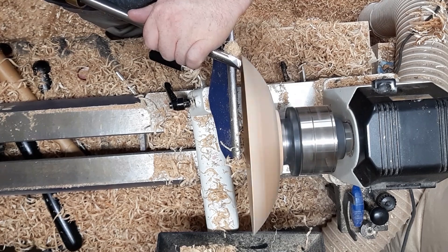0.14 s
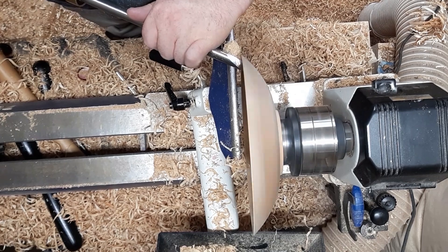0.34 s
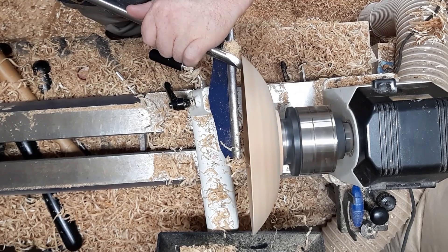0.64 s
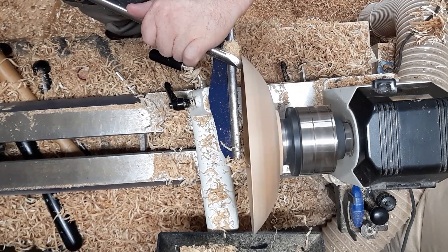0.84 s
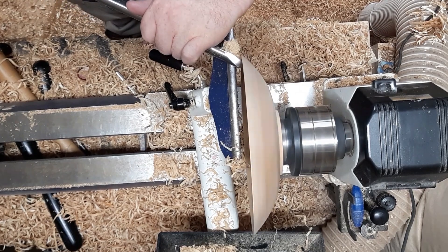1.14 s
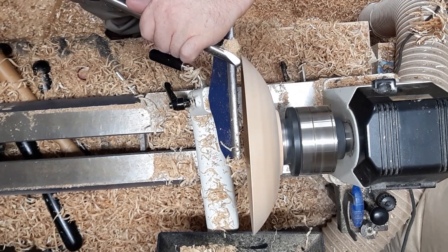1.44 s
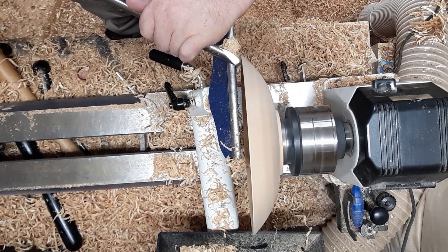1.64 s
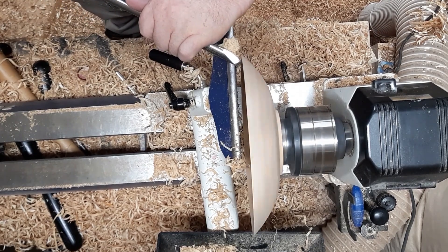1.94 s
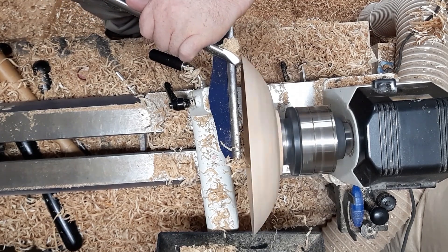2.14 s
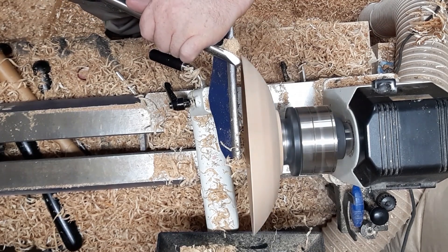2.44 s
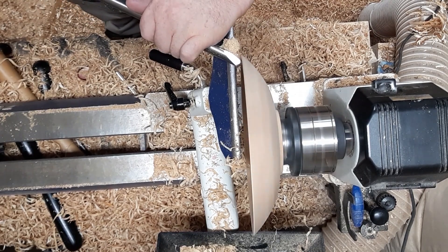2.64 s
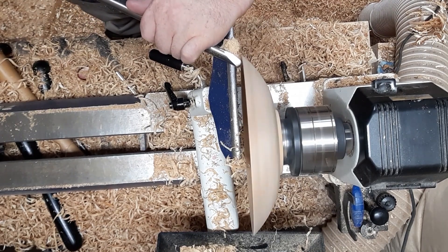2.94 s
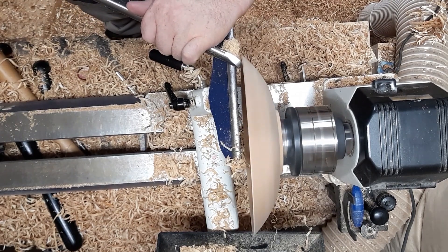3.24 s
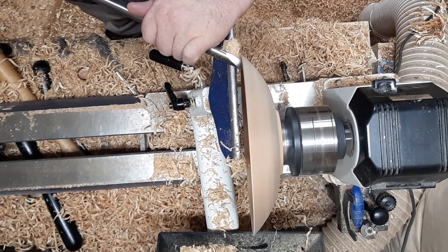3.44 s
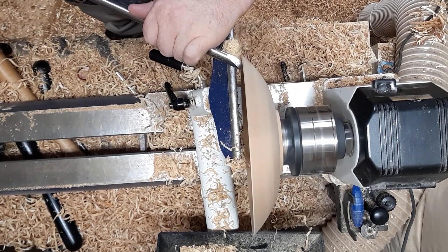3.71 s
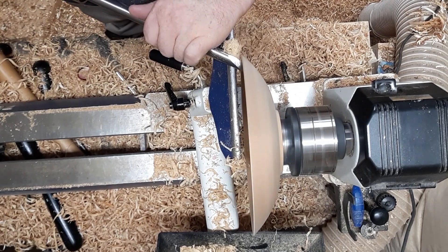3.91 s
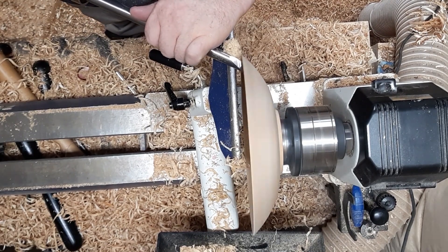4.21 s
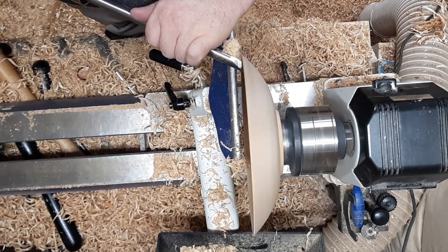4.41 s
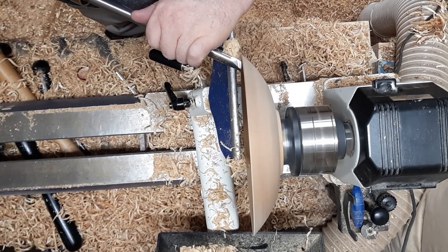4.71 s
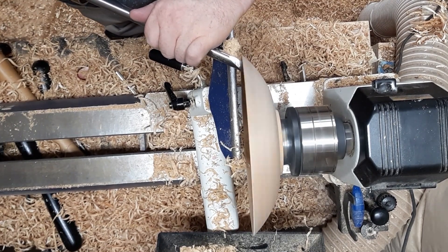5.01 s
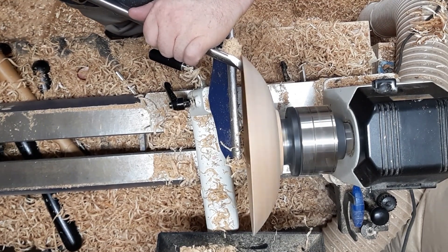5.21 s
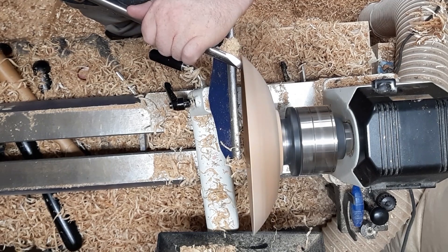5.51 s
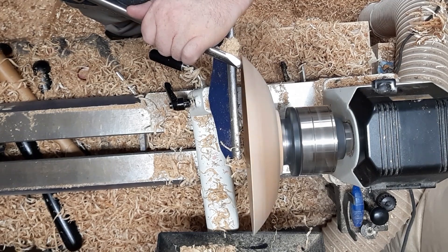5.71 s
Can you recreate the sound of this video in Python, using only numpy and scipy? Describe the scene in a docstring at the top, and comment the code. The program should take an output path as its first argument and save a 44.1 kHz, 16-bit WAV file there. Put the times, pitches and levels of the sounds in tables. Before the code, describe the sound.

A wood lathe hums steadily while a chisel rasps rhythmically against a turning bowl, lifts off for a second, then cuts again and squeals.

```python
"""A small workshop: a gouge shaves a wooden bowl on a lathe, lifts off for a second, and bites again.
The edge meets nearly the same wood every turn: end grain rasps once a turn, the thin wall rings at its
own angles. Hand pressure sets the loudness; when the edge stops biting, the bevel rides and squeals.
The motor hums, sagging under load, and its speed controller whistles. The gouge taps its rest,
a chip lands, and the room adds a short tail."""
import sys
import numpy as np
from scipy import signal
from scipy.fft import rfft, irfft, next_fast_len
from scipy.io import wavfile
from scipy.ndimage import map_coordinates

SR = 44100
rng = np.random.default_rng(int(sys.argv[2]) if len(sys.argv) > 2 else 0)


def inscribe(sig):
    """Save sig as 16-bit PCM at rate SR to the path in sys.argv[1].

    A 1-D sig is mono; a 2-D sig holds one channel per row.
    Samples are clipped to [-1, 1] before scaling.
    """
    pcm = np.round(np.clip(np.atleast_2d(sig).T, -1, 1) * 32767)
    wavfile.write(sys.argv[1], SR, pcm.astype(np.int16))


N = 258426

# spindle, slower under the cut: (time [s], speed [turns/s])
SPINDLE = [(0, 15.1), (1.35, 15.1), (1.55, 15.22), (2.55, 15.19), (2.7, 15.03), (3.7, 15.05), (4.5, 15.07),
           (5.86, 15.09)]
TIME_S = np.arange(N) / SR
SIDES = np.array([[.5], [-.5]])  # splits a left-minus-right offset
ENTRY_S = 2.616  # second cut starts
SEATED_DB = -28.5  # above this pressure the edge stays in the wood all the way round


def amp(db):
    """Decibels to gain."""
    return 10 ** (np.asarray(db) / 20)


def unit(x):
    """Scale to rms 1."""
    return x / np.sqrt(np.mean(x ** 2) + 1e-20)


def gate(over_db, steepness):
    """Soft switch: 0 far below 0 dB, 1 far above."""
    return 1 / np.sqrt(1 + amp(-over_db) ** steepness)


def along(points, hz):
    """Interpolate (frequency [Hz], value) points on a log axis."""
    f, v = np.transpose(points)
    return np.interp(np.log(hz + 1), np.log(f + 1), v)


def curve(points):
    """Interpolate (time [s], value) points at every sample."""
    return np.interp(TIME_S, *np.transpose(points))


def wobble(rate_hz):
    """Smooth random curve, rate_hz knots a second."""
    size = 8 * int(N * rate_hz / SR) + 32
    grid = np.arange(size) / 8
    smooth = map_coordinates(rng.standard_normal(size // 8), [grid])
    return np.interp(TIME_S * rate_hz, grid, smooth)


def filtered(x, response):
    """Apply a complex frequency response."""
    size = next_fast_len(N + 8192, True)
    return irfft(rfft(x, size) * response(np.fft.rfftfreq(size, 1 / SR)), size)[..., :N]


def coloured(x, spectrum):
    """Shape by (frequency [Hz], level [dB]) points; rms 1."""
    return unit(filtered(x, lambda hz: amp(along(spectrum, hz))))


def resonance(hz, centre_hz, width_hz):
    """Causal response of one mode."""
    return 1j * hz * width_hz / (centre_hz ** 2 - hz ** 2 + 1j * hz * width_hz)


def ringing(x, modes):
    """Drive parallel modes of alternating sign."""
    return filtered(x, lambda f: sum((-1) ** k * amp(db) * resonance(f, hz, width_hz)
                                     for k, (hz, width_hz, db) in enumerate(modes)))


def spread(pair):
    """Two unrelated signals become left and right, most alike in the upper bass."""
    # (frequency [Hz], left-right correlation [0-1])
    likeness = [(30, .5), (120, .88), (260, .72), (600, .68), (1100, .45), (2200, .5), (4400, .3),
                (12000, .2)]

    def weights(hz):
        angle = np.arccos(np.clip(along(likeness, hz), 0, 1)) / 2
        return np.array([np.cos(angle), np.sin(angle)])

    mid, side = filtered(pair, weights)
    return np.array([mid + side, mid - side])


def pressure_db():
    """Hand pressure: the first cut lifts off smoothly, the second starts abruptly."""
    # pressure in each cut: (time [s], level [dB])
    first_cut = [(0.0, -29.5), (0.04, -27), (0.16, -25), (0.31, -33), (0.44, -25.5), (0.65, -28),
                 (0.72, -23), (0.82, -22), (0.98, -24), (1.2, -32.5), (1.25, -26.5), (1.33, -23.5),
                 (1.58, -46), (1.64, -59)]
    second_cut = [(2.63, -26), (2.71, -21), (2.79, -23.5), (3.08, -20.5), (3.42, -23.5), (3.58, -20.5),
                  (4.47, -26.5), (4.58, -30), (4.86, -28.5), (5.39, -22.5), (5.69, -26.5), (5.725, -33),
                  (5.755, -25.5), (5.86, -21.5)]
    lift_s, lift_db_per_s, rise_s = 1.67, 150, .0044
    first = amp(curve(first_cut) - lift_db_per_s * np.maximum(TIME_S - lift_s, 0))
    second = amp(curve(second_cut)) * np.clip((TIME_S - ENTRY_S) / rise_s, 0, 1)
    return 20 * np.log10(first + second + 1e-6)


def surface(turns):
    """Roughness under the edge: each turn inherits the coarse relief of the last."""
    # (frequency [Hz], turn-to-turn correlation [0-1])
    memory = [(300, .65), (800, .65), (1600, .6), (2600, .45), (4500, .3), (10000, .15)]
    count, size = int(turns[-1]) + 3, int(SR / SPINDLE[0][1])
    relief = rfft(rng.standard_normal((count, 2, size)))
    kept = along(memory, np.fft.rfftfreq(size, 1 / SR))
    for k in range(1, count):
        relief[k] = kept * relief[k - 1] + np.sqrt(1 - kept ** 2) * relief[k]
    tracks = irfft(relief, size).transpose(1, 0, 2).reshape(2, -1)
    return spread(np.array([map_coordinates(track, [(turns + 1) * size]) for track in tracks]))


def sector(turns, angle_turns, width_turns):
    """Bell-shaped swell once a turn."""
    return np.exp(-.5 * (((turns - angle_turns + .5) % 1 - .5) / width_turns) ** 2)


def end_grain(turns, bite_db, riding, far_side, spike, onset_turns, fall_turns):
    """Gain over a turn: end-grain strike, lulls along the side grain, softer far-side swell."""
    since = (turns + onset_turns + .02) % 1
    tail = (1 - np.exp(-(since / onset_turns) ** 2)) * np.exp(-since / fall_turns)
    strike = .3 * unit(tail / tail.max() + spike * sector(turns, -.005, .028))
    lulls_db = ((8 + 4 * riding) * sector(turns, .43, .075)
                + 3 * (1 - riding) * sector(turns, -.16, .05)
                + 5 * riding * sector(turns, .1, .055))
    plain = amp(-lulls_db) + far_side * sector(turns, -.37, .075)
    bite = amp(bite_db) ** 2 + .7 * amp(bite_db)
    return np.sqrt((plain + bite * strike) / (plain.mean() + bite * strike.mean()))


def tearing(turns, wood, press_db, bite_db, riding, drag):
    """Fibres snap one after another: a rasp and a hiss of shavings, most at the end grain."""
    # (frequency [Hz], density [dB])
    rasp_spectrum = [(300, -45), (800, -12), (1200, -17.5), (1700, -3.5), (2000, -6), (2400, 1), (3100, 1),
                     (4300, 0), (5000, 2.5), (5600, -0.5), (6500, -1.5), (7200, -20.5), (9000, -23),
                     (12000, -58)]
    hiss_spectrum = [(2000, -62), (7000, -6.5), (8000, -6.5), (9300, 0), (11500, 1), (13500, -0.5),
                     (16000, -4), (18000, -37)]
    torn = wood
    for rate_hz, depth_db in (1900, 1), (150, 1.5), (36, 1):
        torn = torn * unit(amp(depth_db * wobble(rate_hz)))
    scuff = .3 * drag ** 2 + .7 * riding  # a deep cut or riding bevel scuffs the far side too
    rasp_gain = end_grain(turns, bite_db + 2, riding, far_side=.65 * scuff,
                          spike=.2, onset_turns=.068, fall_turns=.085)
    hiss_gain = end_grain(turns, np.maximum(bite_db, -14), riding, far_side=.46 * scuff,
                          spike=.66, onset_turns=.13, fall_turns=.11)
    rasp = amp(press_db - 7) * coloured(torn * rasp_gain, rasp_spectrum)
    hiss = amp(press_db - 8) * coloured(torn * hiss_gain, hiss_spectrum)
    return rasp + hiss


def rumble(turns, wood):
    """The relief shakes the bowl, swelling once a turn."""
    # (frequency [Hz], density [dB])
    spectrum = [(40, -44), (110, -21), (170, -13), (230, -3), (340, 1.5), (425, 1), (490, -1.5), (600, 1),
                (680, -3), (890, -1), (1020, -13.5), (1300, -8.5), (1800, -10), (3000, -46)]
    return amp(-41) * coloured(wood * (1 + .5 * sector(turns, -.17, .098)), spectrum)


def bowl_ring(wood, press_db):
    """The relief rings the bowl faintly all the way round."""
    # (frequency [Hz], width [Hz], level [dB])
    modes = [(745, 45, 1.5), (1440, 42, 11.5), (2465, 60, 4), (3085, 50, 9), (3260, 55, 7), (4795, 70, 6)]
    return amp(press_db - 21) * unit(ringing(wood, modes))


def chatter(turns, modes, drift_rad, shift_turns=0):
    """Each mode sings once a turn, bent off pitch while its sector rubs, then rings out; rms 1."""
    apart_rad, scatter_db, detune, slip_hz = .45, 1.1, .004, 420
    spin_hz = SPINDLE[0][1]
    laps = np.arange(-1, int(turns[-1]) + 2)
    steps = np.arange(-SR // 40, SR // 20)
    offset = steps / SR * spin_hz  # turns from the peak
    out = np.zeros((2, N))
    for hz, first_db, second_db, angle, rise, fall, bend_hz, rough_rad in modes:
        peak = np.interp(laps + angle, turns - shift_turns, np.arange(N), left=-SR, right=N + SR)
        walk, left, right, loudness, tuning = rng.standard_normal((5, len(laps), 1))
        level_db = np.where(peak < ENTRY_S * SR, first_db, second_db)[:, None] + scatter_db * loudness
        attack = -.5 * (offset / rise) ** 2
        release = (rise - np.hypot(offset, rise)) / fall
        swell = np.exp(np.where(offset < 0, attack, release))
        swell *= np.minimum((offset[-1] - offset) / fall, 1)
        bent_turns = (offset - rise * np.log(np.cosh(offset / rise))) / 2
        cycles = (hz * (1 + detune * tuning) * offset + bend_hz * bent_turns) / spin_hz
        phase = 2 * np.pi * cycles + drift_rad * np.cumsum(walk, axis=0)
        at = np.round(peak).astype(int)[:, None] + steps
        envelope = ((at >= 0) & (at < N)) * amp(level_db) * swell
        at = np.clip(at, 0, N - 1)
        for ear, skew in enumerate((left, right)):
            sung = envelope * np.sin(phase + apart_rad * skew + rough_rad * wobble(slip_hz)[at])
            out[ear] += np.bincount(at.ravel(), sung.ravel(), N)
    return unit(out)


def body_ring(turns):
    """The bowl's low modes chatter once a turn."""
    # (frequency [Hz], first cut [dB], second cut [dB], angle after end grain [turns],
    #  rise [turns], fall [turns], bend [Hz], roughness [rad])
    modes = [(418, -4, -.5, .43, .085, .07, 40, .1), (400, -4, -6, -.06, .07, .07, 40, .1),
             (535, -1, -2.5, -.33, .075, .08, 25, .1), (1440, -7.5, -4, .27, .06, .13, 15, .2),
             (760, -5, -4, .2, .06, .08, 0, .2)]
    return amp(-43.5) * chatter(turns, modes, drift_rad=.34)


def rim_flutter(turns, press_db):
    """The thin rim rings, and flutters in spells that build, hold and die."""
    # columns as in body_ring
    modes = [(730, 0, 1.3, -.35, .08, .14, 75, .3)]
    # (start [s], length [s], boost [dB])
    spells = [(0.1, 0.72, 8.5), (3.17, 0.46, 10.3), (3.89, 0.39, 10.3), (5.2, 0.42, 9)]
    ramp_s, boost_db = .25, 0
    for start_s, length_s, db in spells:
        inside_s = np.minimum(TIME_S - start_s, start_s + length_s - TIME_S)
        boost_db += db * np.clip(.5 + inside_s / ramp_s, 0, 1)
    return amp(press_db - 25.3 + boost_db) * chatter(turns, modes, drift_rad=.4)


def wall_ring(turns, excess_db):
    """The thin wall sings, later in the turn while the edge digs in."""
    # columns as in body_ring
    modes = [(1435, 1.5, 0, -.11, .07, .11, 100, .15)]
    # (time [s], delay [turns])
    lag = [(0, 0), (.55, .07), (1.3, .18), (2.95, .18), (3.1, 0), (4, -.02), (5.4, 0), (5.86, .1)]
    return amp(-42 + .3 * excess_db) * chatter(turns, modes, drift_rad=.74, shift_turns=curve(lag))


def wall_chirp(turns, excess_db, bite_db):
    """Higher wall modes chirp ahead of the end grain when the gouge presses firmly but slides."""
    # columns as in body_ring
    modes = [(1690, -5, -1, -.17, .05, .06, 30, .6), (1815, -7, -2, -.2, .06, .07, 15, .6),
             (1900, -11, -8, -.2, .05, .05, 30, .9), (1740, -5, -4, -.02, .05, .05, 0, .7),
             (4880, -5, 0, -.49, .05, .04, 0, .9), (4250, -8, -4, -.44, .05, .04, 0, 1.3)]
    sliding = gate(-2 - bite_db, steepness=4)
    return amp(-39.5 + .28 * excess_db) * sliding * chatter(turns, modes, drift_rad=.593)


def bevel_squeal(turns, excess_db, riding):
    """The bevel squeals while it rides on the wood."""
    # columns as in body_ring
    modes = [(2765, .5, .5, .255, .045, .045, 20, .3), (2765, -1.5, -3.5, -.16, .06, .04, 20, .4),
             (3900, -3, -2, -.42, .06, .05, -300, 1.8), (2200, -8, -12, -.33, .05, .05, 0, 1),
             (4900, -8, -7, .27, .04, .04, 0, .7), (6200, -8, -10, .17, .03, .03, 0, .5)]
    return amp(-34.5 + .3 * excess_db) * riding * chatter(turns, modes, drift_rad=.8)


def grain_knock(turns, press_db, bite_db):
    """A harder bite into the end grain knocks the high modes harder."""
    # columns as in body_ring
    modes = [(2480, -1.5, 2.3, .02, .04, .04, -90, .2), (3070, -1.5, -6, .01, .05, .06, 40, .45),
             (4780, -5, -4, 0, .045, .08, 0, .7), (4000, -6, -10, -.01, .04, .04, 0, .8),
             (3110, -8, -11, .27, .06, .06, 0, .5), (755, -11, -9.5, .2, .06, .08, 0, .2)]
    return amp(press_db - 13 + .56 * bite_db) * chatter(turns, modes, drift_rad=.78)


def gouge(turns):
    """The edge tears the spinning wood and rings the bowl; pressure and bite drive the layers."""
    # dig into the end grain, low on a riding bevel: (time [s], bite [dB])
    bite = [(0, -18), (.21, -15), (.29, -3.5), (.5, 0.5), (.9, 3.5), (1.17, 11), (1.3, 4), (1.52, 10.5),
            (2.7, 4.5), (3.4, 0), (3.7, -8), (4.25, -21), (5.1, -17), (5.28, -6), (5.45, -7), (5.75, 9),
            (5.86, -1)]
    press_db, bite_db = pressure_db(), curve(bite)
    excess_db = press_db - SEATED_DB
    seated = gate(excess_db, steepness=2.16)  # a grazing edge hardly shakes the bowl
    drag = seated * amp(-.15 * bite_db)
    riding = gate(-7.5 - bite_db, steepness=4)
    wood = surface(turns)
    return (tearing(turns, wood, press_db, bite_db, riding, drag)
            + drag * rumble(turns, wood)
            + bowl_ring(wood, press_db)
            + drag * body_ring(turns)
            + rim_flutter(turns, press_db)
            + seated * wall_ring(turns, excess_db)
            + seated * wall_chirp(turns, excess_db, bite_db)
            + seated * bevel_squeal(turns, excess_db, riding)
            + seated * grain_knock(turns, press_db, bite_db))


def tone(cycles, db, balance_db, lead_rad):
    """Slightly unsteady line; standing waves give each side its own level and phase."""
    gain = amp(db + 1.5 * wobble(8.4) + SIDES * balance_db)
    return gain * np.sin(2 * np.pi * cycles + .22 * wobble(17) + SIDES * lead_rad)


def lathe(turns):
    """Motor hum locked to the spindle, drive whistle, whirr of fan and bearings, ringing housing."""
    # (spindle multiple, level [dB], left minus right [dB], left lead [rad])
    motor_lines = [(37.16, -57, 2, -.6), (53.36, -60.5, -3, -.4), (80, -54.5, -8, 2.3),
                   (133.25, -64.5, -4, -.5)]
    # (frequency [Hz], level [dB], left minus right [dB], left lead [rad])
    drive_lines = [(127.4, -64, -0.5, -0.27), (10000, -58.5, 5, 1.85), (10384, -75, 3, 1.7)]
    # (frequency [Hz], density [dB])
    whirr_spectrum = [(20, -30), (50, -11.5), (100, -4), (220, 0.5), (750, 0), (1300, -1.5), (1900, -5),
                      (2600, -12.5), (4200, -12), (5200, -6), (7400, -22), (9300, -12), (11000, -16),
                      (12500, -28)]
    # (frequency [Hz], width [Hz], level [dB])
    housing_modes = [(219.4, 17, -4), (281, 5.2, -0.5), (351.6, 27, -3.5), (454, 12.6, -3), (570, 58, -3.5),
                     (757, 15, -1), (1068.6, 15, 0.5), (1690, 11, -10)]
    hum = sum(tone(multiple * turns, *rest) for multiple, *rest in motor_lines)
    whistle = sum(tone(hz * TIME_S, *rest) for hz, *rest in drive_lines)
    air = spread(rng.standard_normal((2, N))) * amp(1.2 * wobble(25))
    whirr = amp(-53.5) * coloured(air, whirr_spectrum)
    housing = amp(-50) * unit(ringing(spread(rng.standard_normal((2, N))), housing_modes))
    return hum + whistle + amp(-1.4 * SIDES) * (whirr + housing)


def workshop(x):
    """Short diffuse tail; the treble dies first."""
    # (frequency [Hz], t60 [s])
    decay = [(200, 0.23), (2000, 0.16), (12000, 0.025)]
    hz, t, noise = signal.stft(rng.standard_normal((2, SR // 3)), SR, nperseg=256)
    tail = signal.istft(noise * amp(-60 * t / along(decay, hz)[:, None]), SR, nperseg=256)[1]
    return signal.fftconvolve(x, tail / np.linalg.norm(tail[0]), axes=1)[:, :N]


def rest_taps(t60_s):
    """The gouge rattles lightly on its rest, which rings."""
    # (time [s], level [dB])
    taps = [(1.667, -40.5), (2.012, -45.5), (2.179, -41), (2.35, -42), (2.523, -46), (3.209, -39),
            (4.931, -37)]
    # (frequency [Hz], width [Hz], level [dB])
    modes = [(582, 40, 11), (1044, 54, 14), (1570, 200, 1.5), (2200, 390, -5.5)]
    blows, t = np.zeros((2, N)), np.arange(SR // 10) / SR
    for start_s, db in taps:
        at = round(start_s * SR)
        blows[:, at:at + len(t)] += amp(db + 10 - 60 * t / t60_s) * rng.standard_normal((2, len(t)))
    return ringing(blows, modes)


def chip(start_s, hz, burst_db, t60_s):
    """A loose chip lands with a faint bright tick."""
    t = TIME_S - start_s
    burst = (t > 0) * amp(burst_db - 60 * np.abs(t) / t60_s) * rng.standard_normal((2, N))
    return filtered(burst, lambda f: resonance(f, hz, hz / 4) ** 2)


def scene():
    """Cut, taps and chip in the room, over the lathe; the cut reaches the left side first."""
    # balance of the cut: (frequency [Hz], left minus right [dB])
    balance = [(60, 2), (110, -1.0), (200, -1), (380, -2.5), (700, 1), (1290, -5), (2380, -2), (4400, -7),
               (8120, 1.5), (15000, 1.0)]
    first_strike_turns, lead_s = .875, 7.5e-5
    turns = np.cumsum(curve(SPINDLE)) / SR - first_strike_turns
    cut = filtered(gouge(turns),
                   lambda hz: amp(SIDES * along(balance, hz)) * np.exp(2j * np.pi * hz * lead_s * SIDES))
    tick = chip(start_s=2.279, hz=5200, burst_db=-37, t60_s=.07)
    work = cut + rest_taps(t60_s=.089) + tick
    return work + amp(-11) * workshop(work) + lathe(turns)


def record(dry):
    """Brick-wall low-pass."""
    return filtered(dry, lambda hz: hz < 16050)


dry = scene()
out = record(dry)
inscribe(out)
```